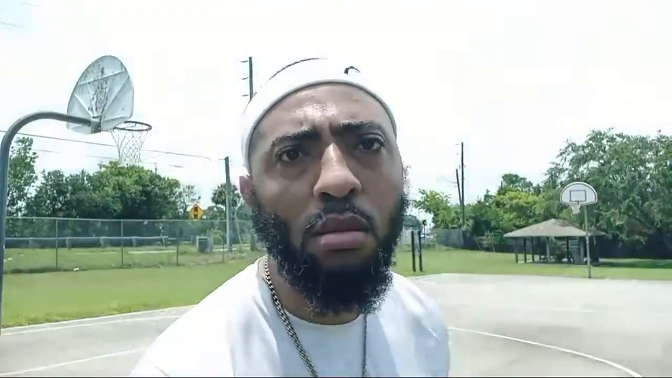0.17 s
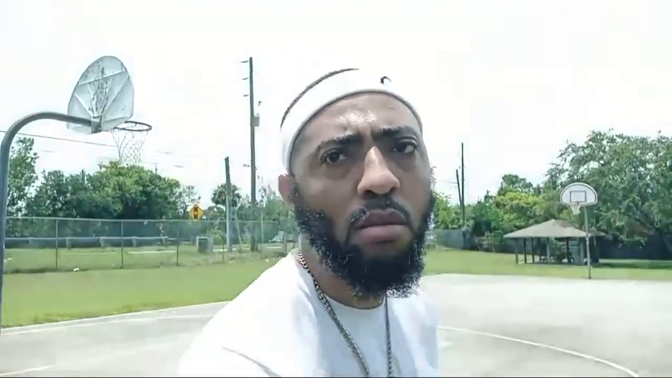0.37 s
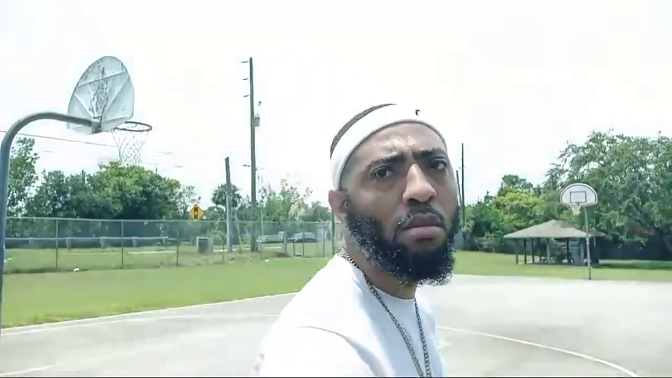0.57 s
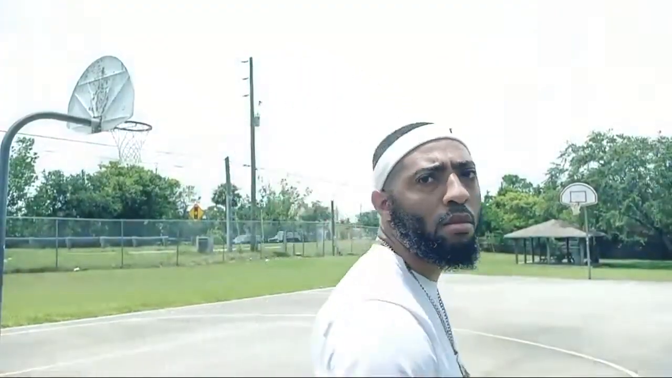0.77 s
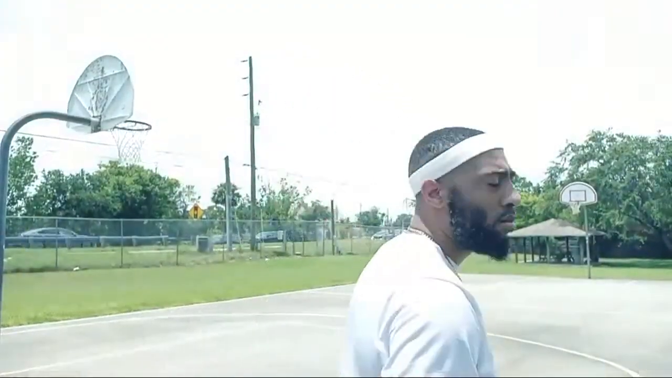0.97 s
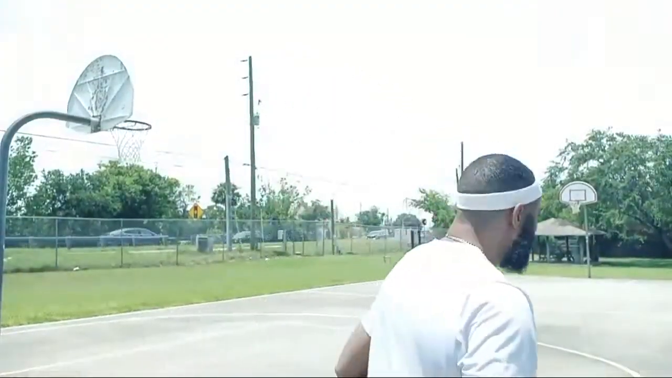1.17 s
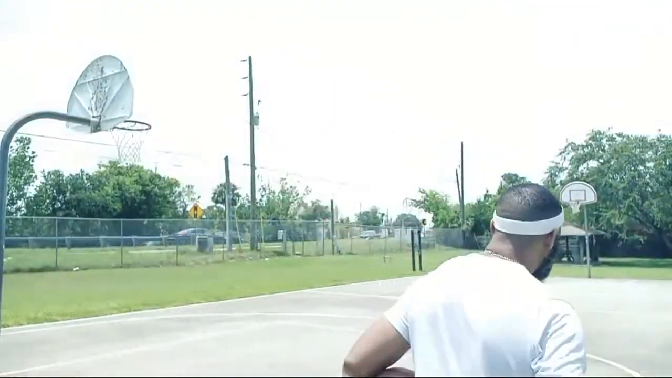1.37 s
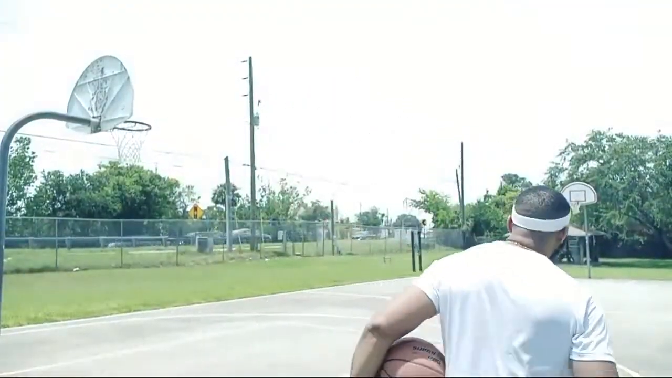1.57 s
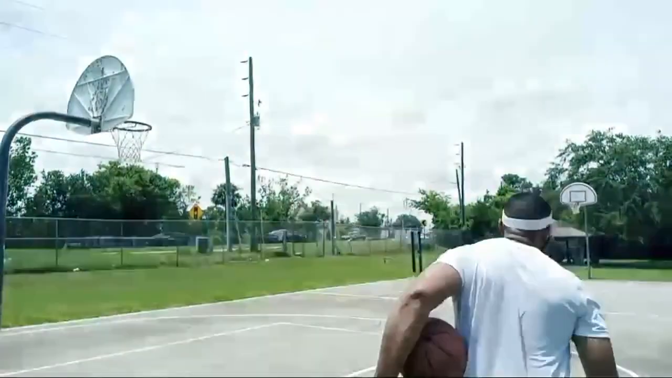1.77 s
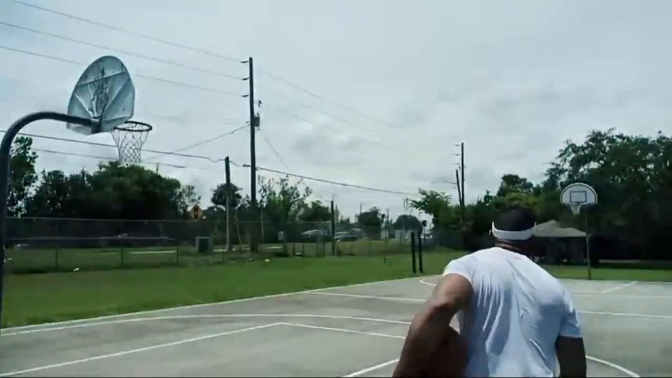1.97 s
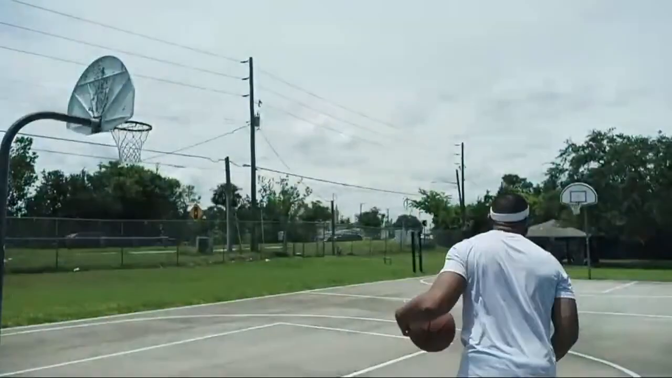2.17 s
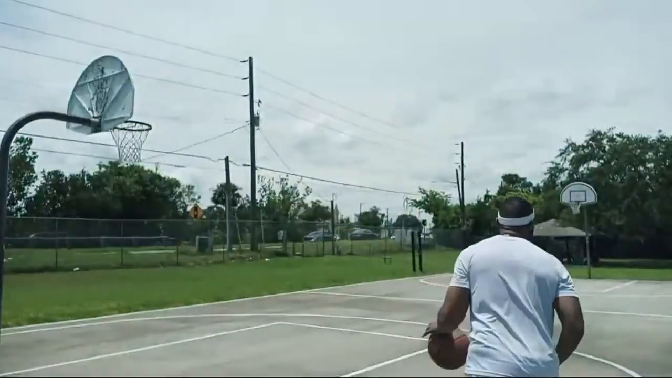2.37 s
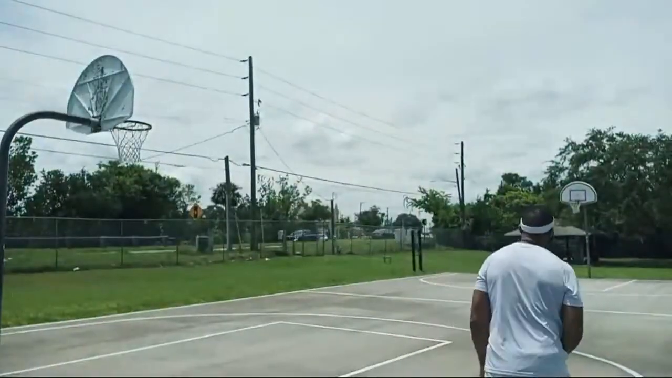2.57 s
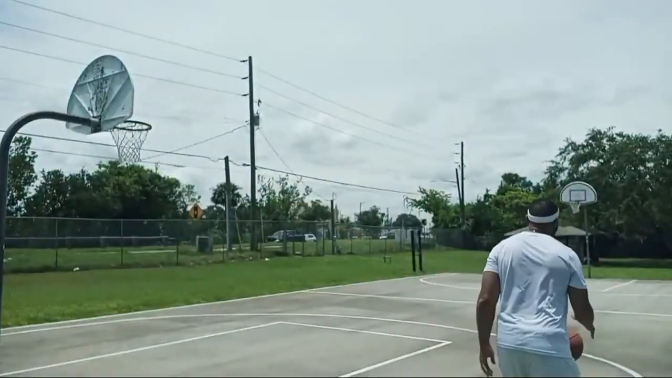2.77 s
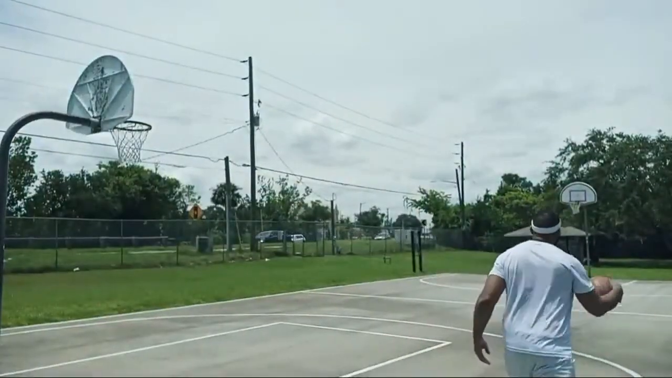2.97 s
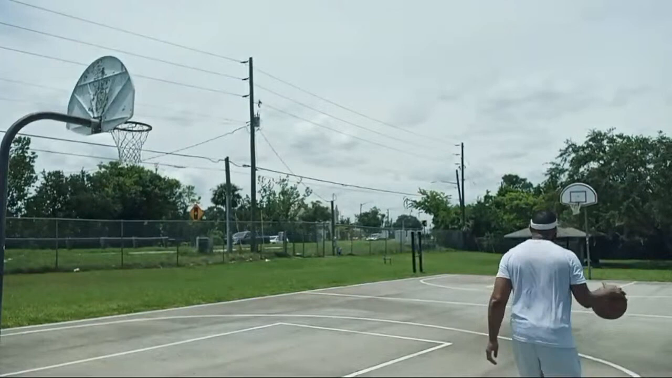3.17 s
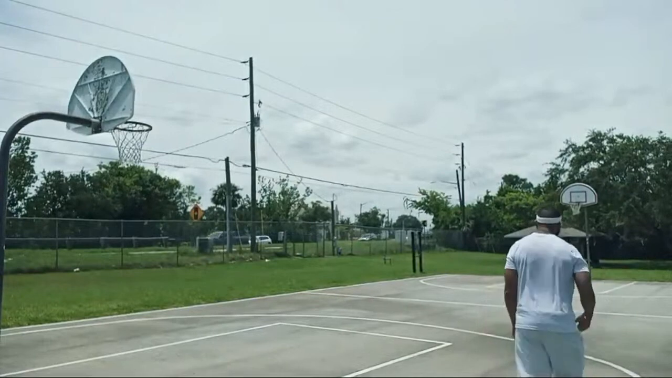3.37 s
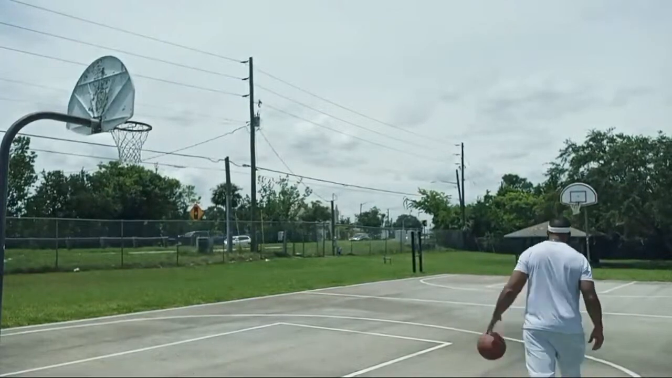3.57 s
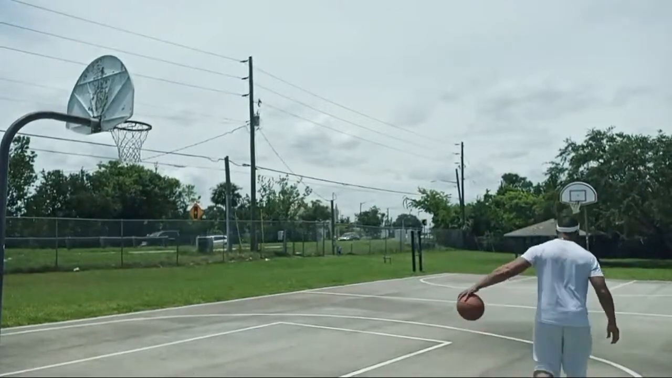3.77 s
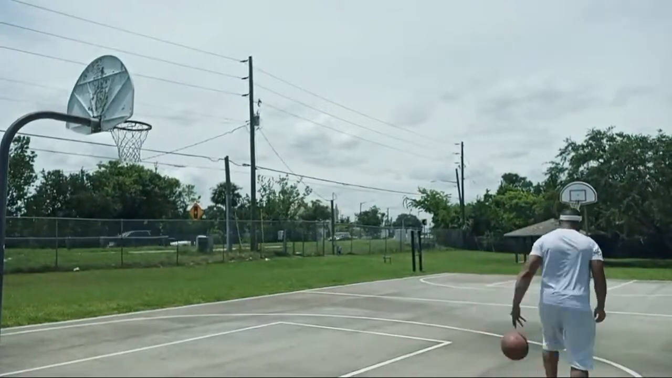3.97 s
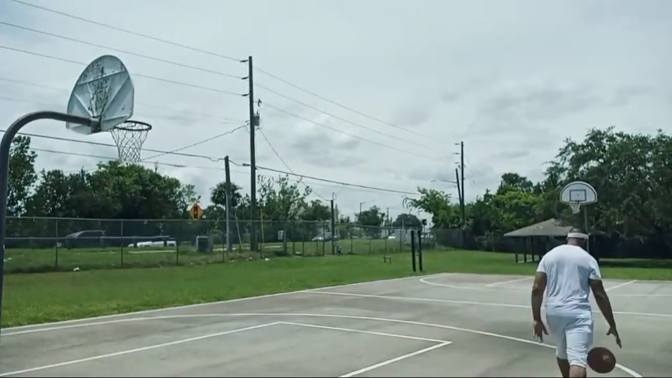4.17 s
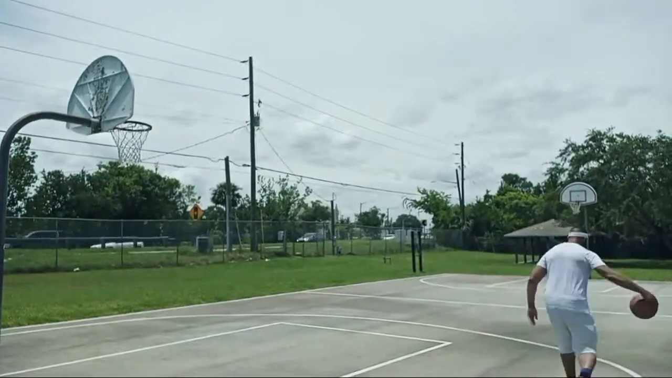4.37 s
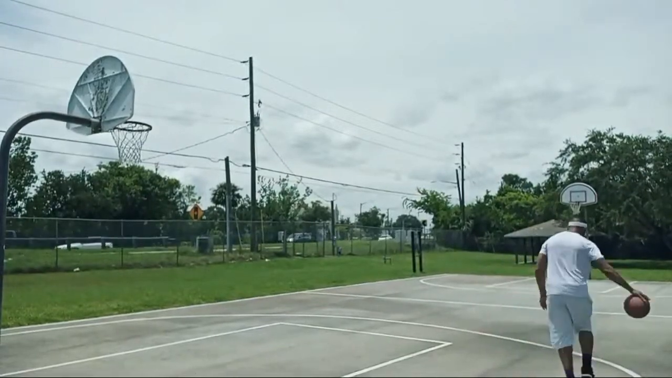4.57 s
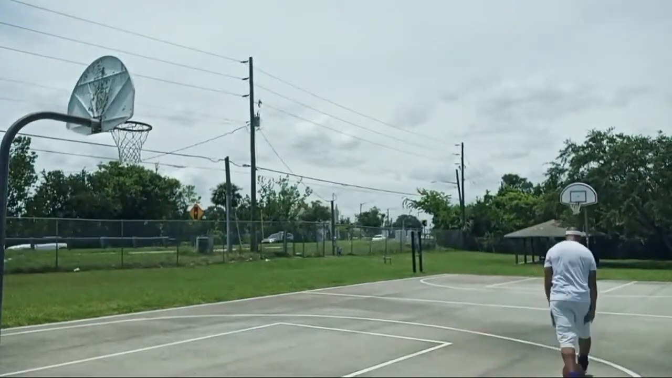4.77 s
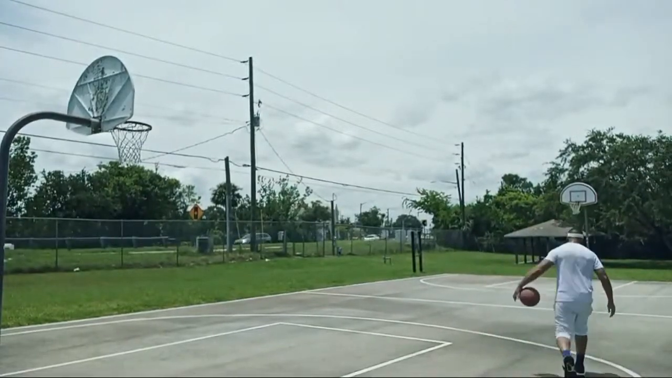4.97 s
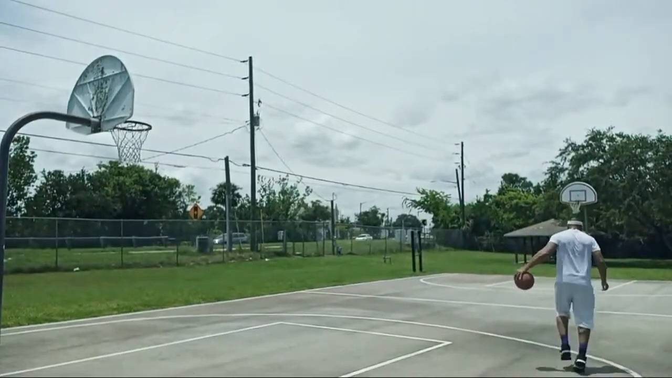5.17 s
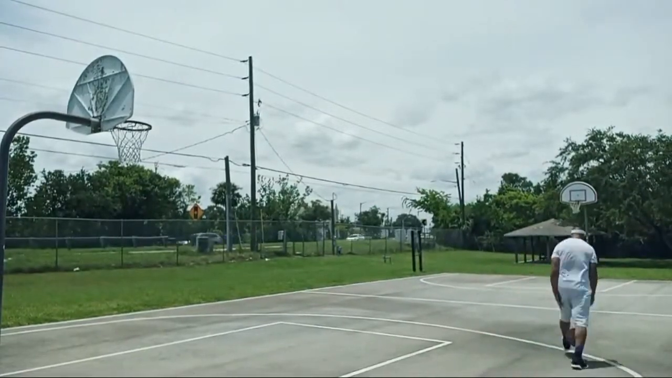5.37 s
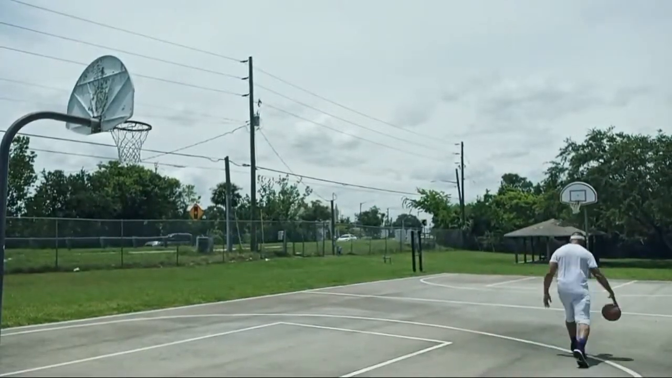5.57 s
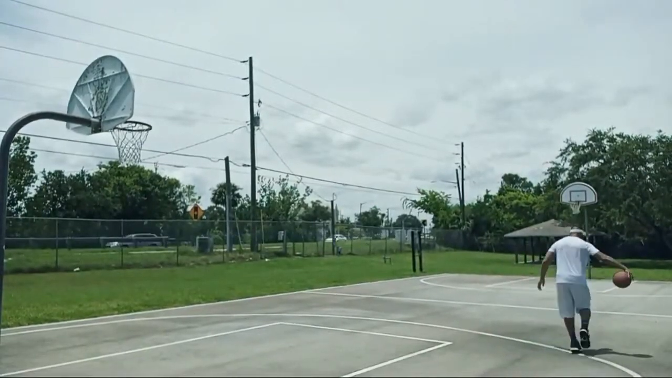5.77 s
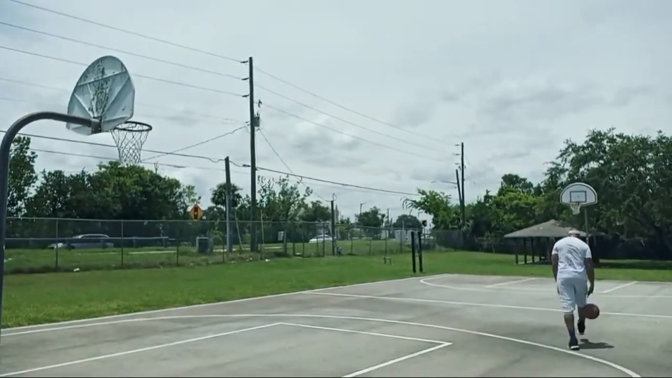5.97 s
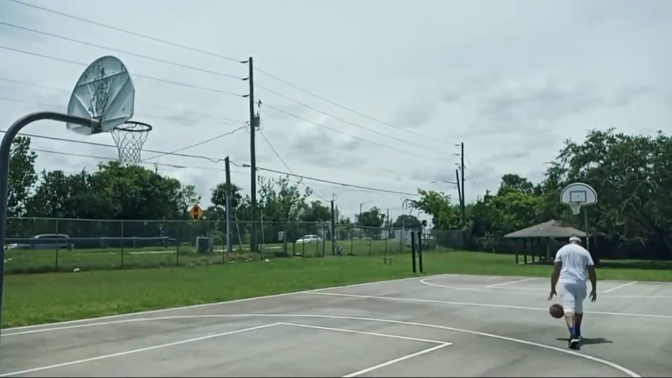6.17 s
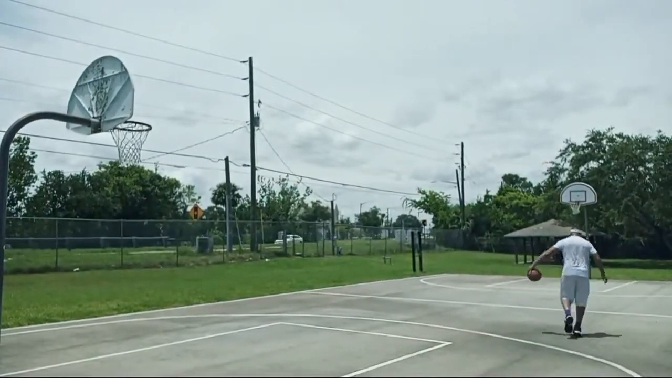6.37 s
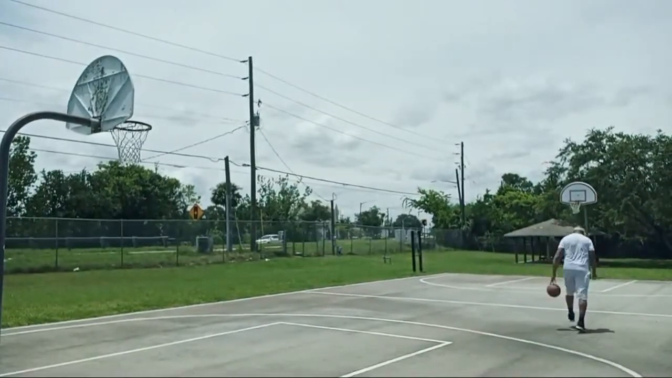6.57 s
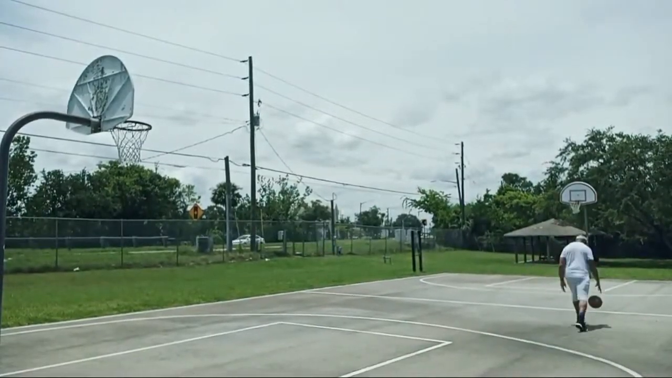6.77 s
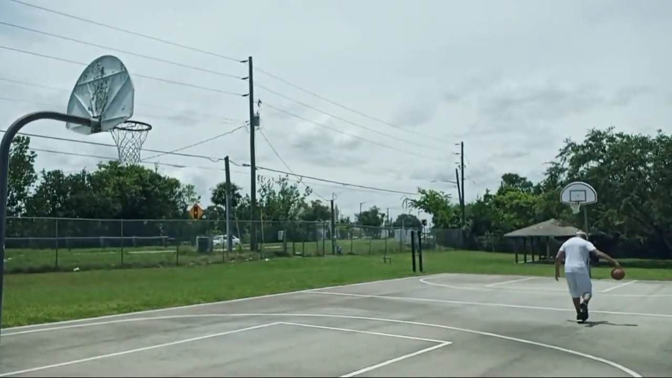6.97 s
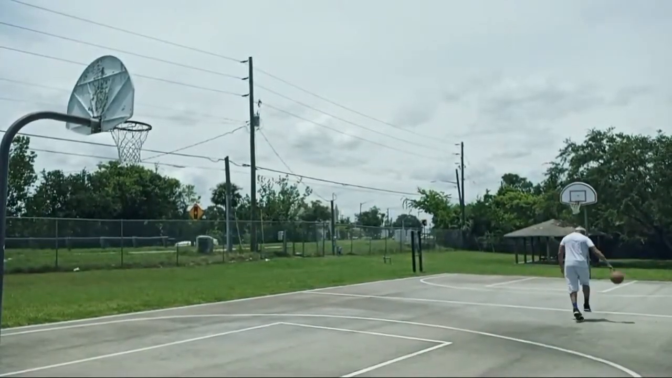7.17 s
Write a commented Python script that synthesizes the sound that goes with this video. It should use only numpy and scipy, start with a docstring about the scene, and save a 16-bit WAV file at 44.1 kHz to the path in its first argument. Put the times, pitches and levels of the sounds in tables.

```python
"""An outdoor concrete court in a park: a basketball is dribbled away, a heel landing and a toe pushing off each stride.
Each bounce is a noise-struck slap of shell modes, a low thump sagging in pitch and a faint ring of the air inside.
Shoes are short bursts of grainy noise. Insects throb high in the trees over far traffic and a soft rustle.
Gusts of shaped noise rumble, single puffs thud on the microphone, and bands of noise swish like clothing."""
import sys
import numpy as np
from scipy import signal
from scipy.fft import rfft, irfft
from scipy.io import wavfile

SR = 44100
rng = np.random.default_rng(int(sys.argv[2]) if len(sys.argv) > 2 else 0)


def bounce(signal):
    """Save signal as a 16-bit WAV file at the path given by the first command-line argument."""
    frames = np.transpose(np.atleast_2d(signal))
    limited = np.clip(frames, -1, 1)
    pcm = np.round(limited * 32767).astype(np.int16)
    wavfile.write(sys.argv[1], SR, pcm)


N = 318843
TIME = np.arange(N) / SR
SHORT = np.arange(SR // 2) / SR


def amp(db):
    """Decibels to gain."""
    return 10 ** (np.asarray(db) / 20)


def unit(x):
    """Scales to rms 1."""
    return x / np.sqrt(np.mean(x ** 2) + 1e-20)


def curve(rows):
    """Joins (s, value) rows by straight lines."""
    return np.interp(TIME, *np.transpose(rows))


def hump(s, db, half_s):
    """Gaussian swell of gain around time s, down to 1/e at half_s either side."""
    return amp(db) * np.exp(-((TIME - s) / half_s) ** 2)


def add(mix, s, sound):
    """Mixes a sound in at time s."""
    part = mix[max(round(s * SR), 0):][:len(sound)]
    part += sound[:len(part)]


def noise(colour):
    """Steady noise of rms 1 with a (Hz, dB) spectrum, joined on a log frequency axis."""
    hz, db = np.transpose(colour)
    shape_db = np.interp(np.log(np.fft.rfftfreq(N, 1 / SR) + 1), np.log(hz), db)
    return unit(irfft(rfft(rng.standard_normal(N)) * amp(shape_db), N))


def drift(top_hz):
    """Random wander of rms 1, holding only rates below top_hz."""
    kept = np.fft.rfftfreq(N, 1 / SR) < top_hz
    return unit(irfft(rfft(rng.standard_normal(N)) * kept, N))


def band(x, low_hz, high_hz, order=2):
    """Causal band-pass."""
    edges_hz = [low_hz, min(high_hz, SR / 2 - 1)]
    return signal.sosfilt(signal.butter(order, edges_hz, "band", fs=SR, output="sos"), x)


def split(x, centres_hz):
    """Overlapping bands that sum to the whole."""
    hz, spectrum = np.fft.rfftfreq(len(x), 1 / SR), rfft(x)
    return [irfft(spectrum * np.interp(hz, centres_hz, one), len(x)) for one in np.eye(len(centres_hz))]


def patchy(x, centres_hz, depth_db, top_hz):
    """Lets each band wander in level on its own."""
    return sum(part * amp(depth_db * drift(top_hz)) for part in split(x, centres_hz))


def mode(hz, db, t60_s):
    """One dying sine."""
    return amp(db - 60 * SHORT / t60_s) * np.sin(2 * np.pi * hz * SHORT)


def push(start_hz, end_hz, sag_s, crest_s, steep):
    """A shove of air: a few low cycles under an envelope of height 1 at crest_s, gliding in pitch."""
    hz = end_hz + (start_hz - end_hz) * np.exp(-SHORT / sag_s)
    age = SHORT / crest_s
    envelope = (age * np.exp(1 - age)) ** steep
    return envelope * np.sin(2 * np.pi * np.cumsum(hz) / SR)


# Traffic spectrum. Each row: frequency in Hz, relative density in dB per Hz.
TRAFFIC_COLOUR = [(60, -22), (200, 3), (450, 0), (1000, 1), (1900, -3.5), (2800, -13.5), (4000, -25),
                  (6000, -28.5), (16000, -33)]
# Rustle of leaves and clothing. Each row: time in seconds, relative level in dB.
RUSTLE_LEVEL = [(0.0, -60.5), (0.4, -62.5), (1.61, -67.5), (1.88, -62.5), (1.97, -71), (2.29, -72),
                (2.3, -69)]
# Rustle spectrum. Each row: frequency in Hz, relative density in dB per Hz.
RUSTLE_COLOUR = [(300, 2.5), (1000, -11), (1700, 2.5), (3000, -4), (5000, -13.5), (11000, -17),
                 (16000, -11.5)]


def park(traffic_db=-59.0, swell_db=.5, rustle_db=6.0):
    """Far traffic and a soft rustle: two shaped noises whose bands shift in level."""
    traffic = noise(TRAFFIC_COLOUR) * amp(traffic_db + swell_db * drift(10))
    rustle = noise(RUSTLE_COLOUR) * amp(rustle_db + curve(RUSTLE_LEVEL) + drift(39))
    return patchy(traffic + rustle, np.geomspace(400, 5000, num=14), depth_db=2.5, top_hz=11)


# Pace of the chorus. Each row: time in seconds, throbs per second.
THROB_PACE = [(0, 7.47), (2, 7.64), (4.8, 7.86), (5.8, 8.56), (6.6, 7.97)]
# Buzz spectrum. Each row: frequency in Hz, relative density in dB per Hz.
BUZZ_COLOUR = [(4500, -42), (5800, -22.5), (6400, -11), (7500, -6), (7900, -3.5), (8100, -1), (8800, 2),
               (9900, 3.5), (10550, 1.5), (10850, -13.5), (12000, -16), (16000, -30)]
# Sizzle spectrum. Each row: frequency in Hz, relative density in dB per Hz.
SIZZLE_COLOUR = [(5000, -32), (8000, -24), (11000, 1), (12500, -2.5), (15500, 0), (16000, 8)]
# Sizzle before its throb and waver. Each row: time in seconds, level in dB.
SIZZLE_LEVEL = [(0, -63), (1.3, -55), (3.2, -58), (3.6, -59.5), (6.6, -61), (7.1, -56)]


def insects(buzz_db=-52.5, buzz_depth_db=2.5, sizzle_depth_db=4.5, waver_db=0.6, sizzle_waver_db=1.5, crest=0.17):
    """A high chorus: noise swelling to a sharp crest and fading in step, about eight times a second."""
    turn = 2 * np.pi * np.cumsum(curve(THROB_PACE)) / SR
    # the second harmonic sharpens the crest
    throb = (np.cos(turn) + crest * np.cos(2 * turn)) * (1 + 0.092 * drift(3.6))
    singers = patchy(noise(BUZZ_COLOUR), np.linspace(6000, 11000, num=14), depth_db=1.36, top_hz=9)
    buzz = singers * amp(buzz_db + buzz_depth_db * throb + waver_db * drift(32))
    sizzle_db = curve(SIZZLE_LEVEL) + sizzle_depth_db * throb + sizzle_waver_db * drift(28)
    return buzz + noise(SIZZLE_COLOUR) * amp(sizzle_db)


# Gusts before lumps and buffeting. Each row: time of the height in seconds, level in dB, half-length in seconds.
GUSTS = [(0, -40.5, 0.03), (0.363, -42.5, 0.021), (0.705, -39.5, 0.087), (0.962, -29.5, 0.067),
         (1.82, -53, 0.079), (2.676, -28.5, 0.043), (2.835, -53, 0.059), (4.084, -44.5, 0.18),
         (4.616, -44, .075), (4.891, -41, 0.031), (6.451, -52, 0.028), (7.0, -53.5, .17)]
# Rumble spectrum. Each row: frequency in Hz, relative density in dB per Hz.
BREEZE_COLOUR = [(20, -64), (35, -32), (50, -8.5), (75, 5.5), (100, 3.5), (180, -4.5), (280, -19),
                 (450, -47), (1200, -87)]
# Buffeting spectrum. Each row: frequency in Hz, relative density in dB per Hz.
BUFFET_COLOUR = [(35, -63), (70, 8), (110, 4.5), (170, 8.5), (240, -9), (340, -32.5), (700, -69)]
# Puffs on the microphone. Each row: start in seconds, level in dB, pitch as a factor.
PUFFS = [(0.663, -30.5, 0.8), (0.897, -29, 0.69), (.911, -28, 0.624), (0.9361, -15.5, 0.98),
         (1.194, -34.5, 0.71), (1.267, -20.5, 0.62), (1.305, -21, 0.74), (1.603, -25.5, .7),
         (2.678, -20.5, 0.96), (5.447, -23, 0.65)]
CALM_DB, EARLY_BREEZE_DB, BREEZE_DIES_S = -57, -55, 1.5  # a light breeze drops to a calm
BUFFET_DB = -42.5  # gusts at this level are half rumble, half buffeting


def wind(lumps_db=3):
    """Steady calm and lumpy gusts, whose rumble turns to brighter buffeting when strong; single puffs thud."""
    gusts = hump(0, EARLY_BREEZE_DB, BREEZE_DIES_S) + sum(hump(*gust) for gust in GUSTS)
    buffet = gusts ** 2 / (gusts ** 2 + amp(BUFFET_DB) ** 2)
    rumble = amp(CALM_DB) + (1 - buffet) * gusts * amp(lumps_db * drift(8.9))
    out = rumble * noise(BREEZE_COLOUR) + buffet * gusts * noise(BUFFET_COLOUR)
    for s, db, pitch in PUFFS:
        puff = push(start_hz=215 * pitch, end_hz=130 * pitch, sag_s=0.0091, crest_s=.0062 / pitch, steep=1.96)
        add(out, s, amp(db) * puff)
    return out


# Faint swishes, as of clothing when the player turns.
# Each row: time of the height in seconds, level in dB, half-length in seconds, centre in Hz, width in Hz.
SWISHES = [(.035, -55.5, 0.038, 2680, 358), (.076, -61, 0.12, 4500, 2430), (.194, -58, .033, 1970, 200),
           (.723, -58.5, .11, 1540, 630), (0.846, -50.5, 0.0348, 1683, 220),
           (1.67, -56.5, 0.025, 1250, 118), (3.118, -63, .028, 3360, 497)]


def clothing(rise_share=.06):
    """Cloth sliding on cloth: soft bands of noise that climb in pitch through each swish."""
    out = np.zeros(N)
    for s, db, half_s, hz, width_hz in SWISHES:
        centre_hz = hz * (1 + rise_share * np.clip((TIME - s) / half_s, -2, 2))
        carrier = np.cos(2 * np.pi * np.cumsum(centre_hz) / SR)
        out += hump(s, db, half_s) * unit(drift(width_hz / 2) * carrier)
    return out


# Shell pressed on the concrete. Each row: nominal mode in Hz, relative level in dB, t60 in seconds.
SHELL_MODES = [(476, 0.5, 0.053), (596, -2.5, 0.032), (983, -8, 0.051), (1116, 2.5, 0.015),
               (1622, 4.5, 0.011), (1930, -2, 0.0089), (2220, -4, 0.004), (2420, -6.5, 0.011),
               (3180, -4, 0.0075), (4170, -15, 0.02), (5100, -12, 0.01)]
# Centres of the slap bands in Hz.
SLAP_HZ = (550, 1000, 1700, 2900, 5000)


def slap(levels_db, grit=0.048, grit_rise_s=0.0013, grit_decay_s=0.0021, lift_s=0.011, lift_grit=0.011, tick_db=-7):
    """Crushed grit, the first touch and the lift-off strike the shell; starts 10 ms before the touch."""
    t = SHORT - .01
    crush = grit * np.exp(np.minimum(t / grit_rise_s, -t / grit_decay_s))
    lift_off = lift_grit * np.exp(-((t - lift_s) / 0.0043) ** 2)
    force = (crush + lift_off) * rng.standard_normal(len(t))
    force[np.argmin(abs(t))] += .5  # first touch
    # each bounce lands on another spot of the ball, which shifts the modes and their balance
    shifts = rng.normal(1, .015, len(SHELL_MODES))
    shell = sum(mode(hz * shift, db, t60_s) for shift, (hz, db, t60_s) in zip(shifts, SHELL_MODES))
    struck = signal.fftconvolve(force, shell)[:len(t)]
    knock = band(struck + amp(tick_db) * force, 204, 3100, order=3)
    return sum(amp(db) * unit(part) for db, part in zip(levels_db, split(knock, SLAP_HZ)))


# Air inside the ball. Each row: cluster centre in Hz, relative level in dB, t60 in seconds.
CAVITY_MODES = [(520, 5.5, 0.21), (1027, -4.5, 0.29), (1310, 5, 0.15), (1704, 0, 0.27), (2260, -5, 0.47),
                (2770, -11, 0.44), (3300, -8.5, 0.24)]


def ring(blur=0.036, count=14):
    """The air in the spinning ball rings on in dense clusters of close modes."""
    out = np.zeros(len(SHORT))
    for hz, db, t60_s in CAVITY_MODES:
        draws = rng.standard_normal((count, 2))
        cluster = sum(weight * mode(hz * (1 + blur * away), db, t60_s) for away, weight in draws)
        out += unit(cluster) * mode(hz, db, t60_s).std()
    return out


# Each row: touch in seconds, thump level in dB, thump pitch as a factor, slap level in dB,
# slap brightness in dB per octave, range favoured by the struck spot in Hz, ring gain in dB.
BOUNCES = [(2.6002, -12, 1.32, -41.5, 1.4, 1000, -56), (3.4506, -14, 1.15, -48.5, -0.9, 1000, -51),
           (4.1088, -15, 1.19, -48, 3, 1650, -47.5), (4.7785, -19, 1.21, -46, 4, 1000, -50.5),
           (5.4650, -13.5, 1.07, -50, -1.5, 1000, -44), (6.111, -18.5, 1.28, -49.5, 1, 1560, -42.5),
           (6.7475, -18, 1.26, -52, -2, 550, -48)]
# Colour common to the slaps: relative level in dB of each band of SLAP_HZ.
SLAP_DB = [-2, -6.5, 0, -9, -18.5]
SPOT_DB, SPOT_OCTAVES = 6, .3  # lift and width of the favoured range
FIRST_BOUNCE_S = BOUNCES[0][0]
DULLING_DB_PER_S = 2.5  # loss in the top slap band as the player walks off


def ball(thump_delay_s=0.002, belly_db=-10):
    """Slap on touching, thump as the ball flattens, then the air inside rings on; returns lows and highs."""
    low, high = np.zeros((2, N))
    hz = np.array(SLAP_HZ)
    for s, thump_db, pitch, slap_db, brightness, spot_hz, ring_db in BOUNCES:
        thump = push(start_hz=238 * pitch, end_hz=72 * pitch, sag_s=0.006, crest_s=0.0051, steep=0.87)
        belly = amp(belly_db) * push(start_hz=267, end_hz=254, sag_s=0.011, crest_s=0.0038, steep=1.28)
        tilt_db = brightness * np.log2(hz / np.median(hz))
        spot_db = SPOT_DB * np.exp(-(np.log2(hz / spot_hz) / SPOT_OCTAVES) ** 2)
        far_db = DULLING_DB_PER_S * (s - FIRST_BOUNCE_S) * (hz / hz.max()) ** 2
        add(low, s + thump_delay_s, amp(thump_db) * (thump + belly))
        add(high, s - .01, slap(slap_db + np.array(SLAP_DB) + tilt_db + spot_db - far_db))
        add(high, s, amp(ring_db) * ring())
    return low, high


def sparse_tail(taps_per_s, t60_s):
    """Random sparse reflections under a decay."""
    taps = rng.standard_normal(len(SHORT)) * (rng.random(len(SHORT)) < taps_per_s / SR)
    return taps * amp(-60 * SHORT / t60_s)


def court(x, wet_db, t60_s):
    """Adds thin scatter from fence and trees: sparse reflections that build up, then decay."""
    tail = sparse_tail(2000, t60_s) * (1 - np.exp(-SHORT / 0.0056))
    return x + amp(wet_db) * signal.fftconvolve(x, tail / np.linalg.norm(tail))[:N]


ECHO_DB, ECHO_DB_PER_S = -39, 3.5  # gain at the first bounce, and its climb


def far_echo(x, delay_s=.038, t60_s=0.37):
    """A dull, smeared answer from the edge of the park, which stands out more as the player walks off."""
    tail = sparse_tail(1500, t60_s)
    out = np.zeros(N)
    add(out, delay_s, signal.fftconvolve(band(x, 470, 5500), tail / np.linalg.norm(tail))[:N])
    return out * amp(ECHO_DB + ECHO_DB_PER_S * (TIME - FIRST_BOUNCE_S))


# Heels landing. Each row: time in seconds, level in dB, decay in seconds.
HEELS = [(4.057, -29.5, 0.0037), (4.709, -47, 0.016), (5.366, -34.5, 0.01), (6.007, -32.5, 0.0097),
         (6.659, -30, 0.01)]
# Toes flicking off. Each row: time in seconds, level in dB, centre in Hz, decay in seconds,
# level in dB of the second drag leading up to it.
TOES = [(3.689, -48, 2900, 0.012, -65), (4.348, -38, 4170, .0035, -47), (4.979, -53, 3300, 0.0083, -43),
        (5.624, -59, 3200, .012, -46), (6.249, -41, 3650, 0.013, -54), (6.833, -64, 3500, 0.0098, -53)]
HEEL_HZ = 2110
# the flat of the sole follows the heel, more softly
SOLE_DELAY_S, SOLE_DB, SOLE_S, SOLE_HZ = 0.011, -15, .005, 2600
# the sole slips twice before the flick, softer the first time
DRAG_LEAD_S, DRAG_S, DRAG_HZ, FIRST_DRAG_DB = .043, 0.024, 2520, -5.5


def scuffs():
    """Heel and sole land, the other shoe drags and flicks off: rows of time s, dB, centre Hz, decay s."""
    rows = []
    for s, db, length_s in HEELS:
        rows.append((s, db, HEEL_HZ, length_s))
        rows.append((s + SOLE_DELAY_S, db + SOLE_DB, SOLE_HZ, SOLE_S))
    for s, db, hz, length_s, drag_db in TOES:
        rows.append((s - 2 * DRAG_LEAD_S, drag_db + FIRST_DRAG_DB, DRAG_HZ, DRAG_S))
        rows.append((s - DRAG_LEAD_S, drag_db, DRAG_HZ, DRAG_S))
        rows.append((s, db, hz, length_s))
    return rows


def shoes(rise_share=0.36, width=1.394, grain_db=6.5, clump_db=3.5, clump_hz=170, fizz_db=-13, tap_db=-7, tap_t60_s=0.018):
    """Soles tap down and drag over grit: short grainy bursts, the shortest with the sharpest tap."""
    out, t = np.zeros(N), SHORT - .03
    clumps_db = clump_db * drift(clump_hz)
    for s, db, hz, length_s in scuffs():
        # each grain holds its size for 16 samples
        sizes_db = grain_db * np.repeat(rng.normal(size=len(t)).clip(-2, 2), 16)[:len(t)]
        swell = np.exp(np.minimum(t / (rise_share * length_s), -t / length_s))
        local_clumps_db = np.roll(clumps_db, -round(s * SR))[:len(t)]
        grains = swell * amp(sizes_db + local_clumps_db) * rng.standard_normal(len(t))
        rasp = unit(band(grains, hz / width, hz * width, order=3))
        fizz = unit(band(grains, 890, 6170, order=6))
        size = amp(db) * swell.std()
        tap = 0.0061 / length_s * amp(tap_db) * unit(mode(hz, 0, tap_t60_s))
        add(out, s + t[0], size * (rasp + amp(fizz_db) * fizz))
        add(out, s, size * tap)
    return out


def scene():
    """Ball and shoes on the court, amid the sounds of the park."""
    background = park() + insects() + wind() + clothing()
    thumps, slaps = ball()
    play = court(thumps, wet_db=-16.5, t60_s=0.15) + court(slaps, wet_db=-16, t60_s=0.12)
    play += court(shoes(), wet_db=-15.5, t60_s=0.073)
    return (background + play + far_echo(slaps))[None]


EDGE_HZ = 15780


def record(dry, threshold_db=-27, squeeze=0.49, recovery_db_per_s=160):
    """Gain control dips the whole level when short-term power is high; then a low cut and a band limit."""
    power_db = 10 * np.log10(signal.lfilter(np.ones(512) / 512, 1, dry[0] ** 2) + 1e-12)
    # peak hold that falls at recovery_db_per_s
    fall_db = TIME * recovery_db_per_s
    held_db = np.maximum.accumulate(power_db + fall_db) - fall_db
    over_db = np.maximum(held_db - threshold_db, 0)
    lag = np.exp(-1 / (0.0052 * SR))
    ducked = dry * amp(-squeeze * signal.lfilter([1 - lag], [1, -lag], over_db))
    lean = signal.sosfilt(signal.butter(2, 36, "high", fs=SR, output="sos"), ducked)
    low_pass = signal.firwin(1023, EDGE_HZ, window=("kaiser", 9), fs=SR)
    return signal.oaconvolve(lean, low_pass[None], "same")


dry = scene()
out = record(dry)
bounce(out)
```